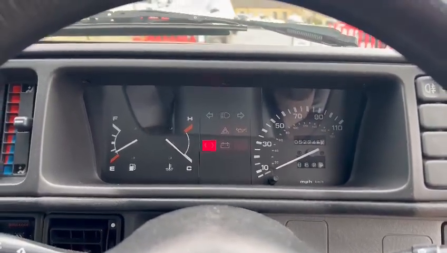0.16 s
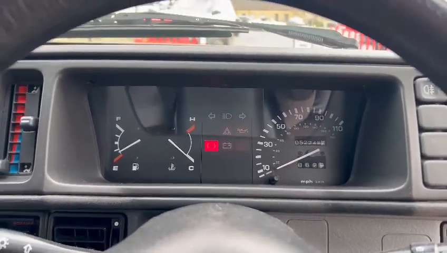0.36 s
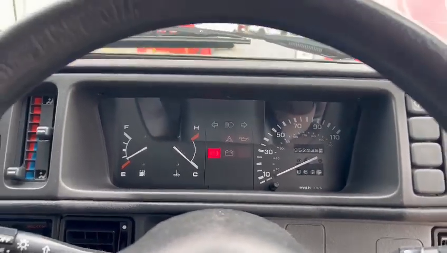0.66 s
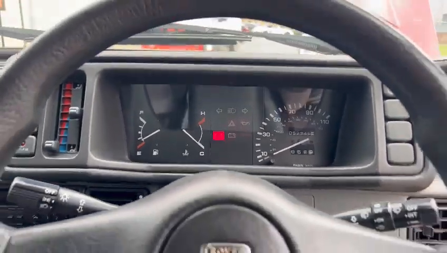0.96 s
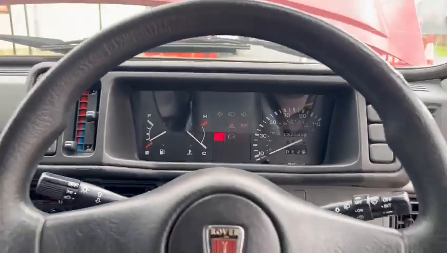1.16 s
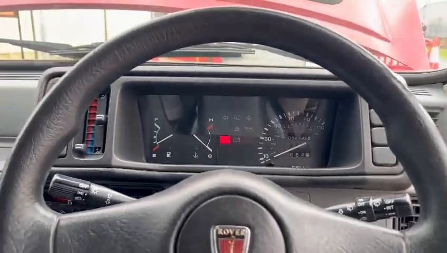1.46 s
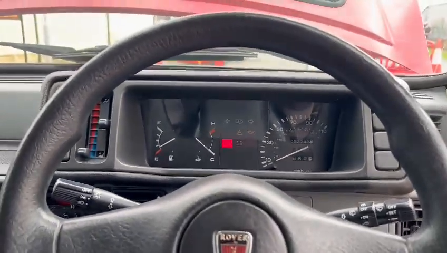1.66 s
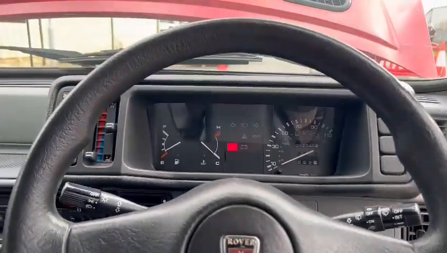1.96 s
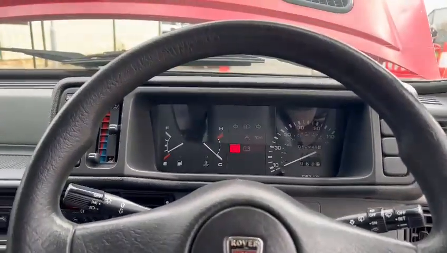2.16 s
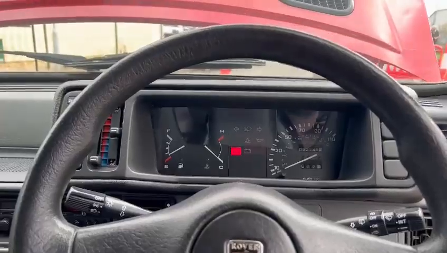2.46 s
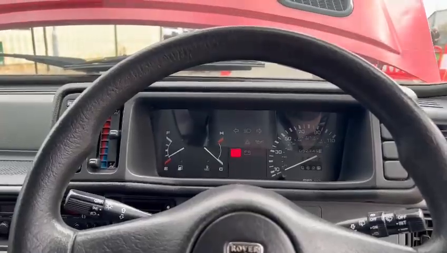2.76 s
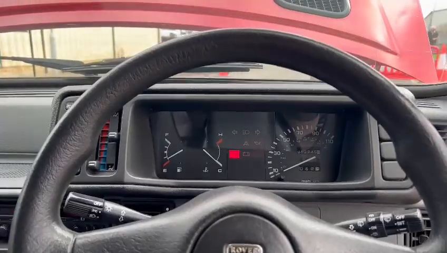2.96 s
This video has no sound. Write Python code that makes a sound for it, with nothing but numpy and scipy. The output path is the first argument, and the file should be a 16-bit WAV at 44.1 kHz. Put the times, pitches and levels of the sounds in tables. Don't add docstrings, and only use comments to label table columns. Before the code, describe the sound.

A small four-cylinder car engine idles steadily with quick ticks, then is blipped twice, booming and roaring; heard from the driver's seat with the bonnet open, by a hand-held stereo microphone.

```python
import sys
import numpy as np
from scipy import signal
from scipy.fft import rfft, irfft, next_fast_len
from scipy.io import wavfile
from scipy.ndimage import uniform_filter1d, map_coordinates

SR = 44100
rng = np.random.default_rng(int(sys.argv[2]) if len(sys.argv) > 2 else 0)


def boost_factor(decibels):
    exponent = np.asarray(decibels, float) / 20
    return 10 ** exponent


def to_wav(sig):
    pcm = np.clip(np.atleast_2d(sig), -1, 1) * 32767
    pcm = np.round(pcm).astype(np.int16)
    wavfile.write(sys.argv[1], SR, pcm.T)


N = 136710


def unit(x):
    return x / np.sqrt(np.mean(x ** 2) + 1e-20)


def along(points, hz):
    f, v = np.transpose(points)
    return np.interp(np.log(hz + 1), np.log(f + 1), v)


def curve(rows):
    s, value = np.transpose(rows)
    return np.interp(np.arange(N) / SR, s, value)


def wobble(rate):
    return map_coordinates(rng.standard_normal(400), [np.arange(N) * rate / SR])


def filtered(x, response):
    m = next_fast_len(N + SR // 2)
    return irfft(rfft(x, m) * response(np.fft.rfftfreq(m, 1 / SR)), m)[..., :N]


def ringing(peaks):
    def response(f):
        total = 0
        for k, (centre, width, db) in enumerate(peaks):
            damping = 1j * f * width
            total = total + (-1) ** k * boost_factor(db) * damping / (centre * centre - f * f + damping)
        return total
    return response


def double_ringing(peaks):
    return lambda f: ringing(peaks)(f) ** 2


def shaped(points):
    return lambda f: boost_factor(along(points, f))


def pulse(phase, depth):
    return 1 + depth * np.cos(phase - 1.1)


# frequency in Hz, left-right correlation from 0 to 1.
EAR_LIKENESS = [(30, .99), (100, .96), (200, .75), (500, .45), (1500, .65), (3000, .62), (5000, .2),
                (8000, .25)]


def rush(response, gate=1):
    def mid_side_gains(hz):
        turn = np.arccos(np.clip(along(EAR_LIKENESS, hz), -1, 1)) / 2
        return response(hz) * [np.cos(turn), np.sin(turn)]
    mid, side = filtered(rng.standard_normal((2, N)) * gate, mid_side_gains)
    return unit(np.array([mid + side, mid - side]))


def tone(phase, db):
    return np.sqrt(2) * boost_factor(db) * np.sin(phase)


# frequency in Hz, density in dB per Hz.
RUMBLE_SPECTRUM = [(12, -35), (24, -12.5), (34, -7.8), (62, -2.6), (110, -11.5), (190, -27.5), (320, -37)]


def body_rumble(over_db):
    level_db = -40 + 0.65 * (over_db + 20) + 1.4 * wobble(9.1)
    return boost_factor(level_db) * rush(lambda f: shaped(RUMBLE_SPECTRUM)(f) * (f < 420))


# frequency in Hz, density in dB per Hz.
IDLE_SPECTRUM = [(110, -26), (180, 1.5), (432, -20), (602, -6.5), (1000, -28), (1360, -10), (1550, -45.5),
                 (1850, -24.5), (3050, -31.5), (3960, -48), (6710, -120)]


def idle_rush(phase):
    return boost_factor(-46.5) * rush(shaped(IDLE_SPECTRUM), pulse(phase, 0.2))


TOP_HZ = 9750

# frequency in Hz, density in dB per Hz.
HISS_SPECTRUM = [(2200, -12), (2600, 2), (3500, -5), (4300, -1), (6300, -1), (7350, -8), (8600, -4),
                 (9650, -12)]


def throttle_hiss(over_db, phase):
    noise = rush(lambda f: shaped(HISS_SPECTRUM)(f) * (f < TOP_HZ), pulse(phase, .15))
    return boost_factor(-44 + 0.76 * over_db) * noise


# frequency in Hz, width in Hz, level in dB.
INJECTOR_MODES = [(6250, 500, 0), (5000, 500, -8), (8700, 800, -8)]


def injector_fizz(over_db, phase):
    noise = rush(lambda f: double_ringing(INJECTOR_MODES)(f) * (f < TOP_HZ), pulse(phase, 0.092))
    return boost_factor(-60.5 + 0.41 * over_db) * noise


def thin_air(over_db):
    centre_hz, width_hz = 11400, 430
    level_db = -62 + 1.3 * over_db + 4.4 * wobble(45)
    return boost_factor(level_db) * rush(lambda f: np.exp(-((f - centre_hz) / width_hz) ** 4))


# frequency in Hz, width in Hz, level in dB.
NEAR_PANEL = [(650, 92, -2), (1312, 140, -3.8), (1424, 33, -0.75)]
FAR_PANEL = [(1841, 39, .1)]


def valve_ticks(hz, phase):
    move_s, move_len_s, jitter_s, scatter_db = 0.92, 0.084, .00004, 1
    firings = np.flatnonzero(np.diff(np.floor(phase / (2 * np.pi))))
    late, strength = rng.standard_normal((2, len(firings)))
    at = firings + np.round(late * jitter_s * SR).astype(int)
    blows = np.bincount(np.clip(at, 0, N - 1), boost_factor(scatter_db * strength), N)
    near = unit(filtered(blows, double_ringing(NEAR_PANEL)))
    far = unit(filtered(blows, double_ringing(FAR_PANEL)))
    moved = np.clip((np.arange(N) / SR - move_s) / move_len_s + .5, 0, 1)
    idle_only = boost_factor(-40 * np.log2(hz / hz[0]))
    return idle_only * (boost_factor(-49.5) * (1 - 0.27 * moved) * near + boost_factor(-51.5) * moved * far)


# frequency in Hz, gain in dB.
WHINE_PATH_DB = [(300, -25), (450, -12), (560, -12), (620, -2), (690, -14), (740, 3), (830, 1), (890, -1)]


def alternator_whine(hz, phase):
    ratio = 7.17
    level_db = -38 + 9 * np.log2(hz / 120) + along(WHINE_PATH_DB, ratio * hz)
    return tone(ratio * phase + .4 * wobble(30), level_db + 1.8 * wobble(14))


# multiple of the firing rate, level in dB at idle, unsteadiness in dB.
IMBALANCE = [(0.499, -46, 0.5), (0.752, -40, 2), (1.498, -40.5, 3.5), (1.748, -47, 4), (3, -60.5, 1.5)]
# frequency in Hz, gain in dB.
IMBALANCE_PATH = [(20, -4.5), (35, -3.8), (62, 2.3), (100, -4.5), (150, 0.8), (185, -13.5), (300, 0)]


def uneven_cylinders(hz, phase):
    speed_db = 3 * np.log2(hz / hz[0])
    out = np.zeros(N)
    for k, db, shaky_db in IMBALANCE:
        level_db = db + speed_db + along(IMBALANCE_PATH, k * hz) + shaky_db * wobble(10)
        out += tone(k * phase + .8 * wobble(9), level_db)
    return out


# frequency in Hz, width in Hz, level in dB.
GULP_MODES = [(1320, 260, -2.9), (472, 43, -1.2)]


def intake_gulp(phase):
    centre_s, length_s = 2.54, 0.029
    swell = np.exp(-((np.arange(N) / SR - centre_s) / length_s) ** 2)
    return boost_factor(-25.5) * swell * rush(double_ringing(GULP_MODES), pulse(phase, 0.18))


# frequency in Hz, width in Hz, level in dB.
TRUNK_MODES = [(217, 89, 0.59), (440, 320, -2.9)]


def intake_growl(over_db, open_db, phase):
    return boost_factor(-36 + open_db + .35 * over_db) * rush(double_ringing(TRUNK_MODES), pulse(phase, 0.43))


# frequency in Hz, density in dB per Hz.
ROAR_SPECTRUM = [(110, -45), (180, -4.5), (475, -4.5), (686, -12), (772, -10), (1400, -12), (2020, -13.5),
                 (2740, -26.5), (3050, -19.5), (3960, -66), (6710, -120)]


def engine_roar(effort_db, phase):
    fade = np.clip((effort_db + 53.5) / 8, 0, 1)
    return boost_factor(effort_db + 0.39 * wobble(25)) * fade * rush(shaped(ROAR_SPECTRUM), pulse(phase, 0.12))


# multiple of the firing rate, level in dB, unsteadiness in dB.
HARMONICS = [(2, -0.27, 1.06), (3, -1, -0.1), (4, -7.5, -3.1), (5, -21, 9), (6, -7.5, 8), (8, -21, 3),
             (9, -13, 9.5)]
# frequency in Hz, gain in dB.
CABIN_GAIN = [(86, -9.5), (115, -14), (140, -19), (168, -30), (205, -27.5), (270, -40), (440, -32.5),
              (620, -48.5)]


def firing_overtones(hz, open_db, phase):
    out = np.zeros(N)
    for k, db, shaky_db in HARMONICS:
        level_db = db + open_db + along(CABIN_GAIN, k * hz) + shaky_db * wobble(13)
        out += tone(k * (phase - .6), level_db)
    return out


# time in seconds, gas push minus piston shake at the firing rate (signed, about -1 to 1).
NET_PUSH = [(0, -0.31), (1.44, .2), (1.56, .9), (1.64, 1.1), (1.69, 0.71), (1.74, 1.5), (1.77, -0.12),
            (1.805, -0.86), (1.835, -0.36), (1.87, -0.81), (2.075, -0.83), (2.115, -0.19), (2.16, -1.1),
            (2.235, .02), (2.3, 1.05), (2.545, 1.3), (2.61, -1.23), (3.1, -0.59)]
# frequency in Hz, level in dB.
SEAT_GAIN = [(40, -46.5), (58, -16), (72, -13), (84, -15.5), (95, -12), (110, -14), (125, -15)]


def cabin_boom(hz, phase):
    push = curve(NET_PUSH)
    bent = np.sign(push) * abs(push) ** 1.39
    return bent * tone(phase, along(SEAT_GAIN, hz) + .6 * wobble(4.8))


# frequency in Hz, left minus right in dB.
EAR_TILT = [(40, -6.7), (80, 3.5), (150, 2.4), (400, 0), (800, -4), (1300, -4.5), (2600, -.6), (5000, 1.1)]


def at_the_ears(x):
    ear = np.array([[.5], [-.5]])
    null_hz, null_width_hz, null_db = 695, 35, -10
    lag_s, lag_under_hz = .000165, 3253

    def response(f):
        null = null_db * np.exp(-((f - null_hz) / null_width_hz) ** 2)
        delay = np.exp(-2j * np.pi * f * lag_s * ear * (f < lag_under_hz))
        return boost_factor(ear * along(EAR_TILT, f) + null) * delay
    return filtered(x, response)


# time in seconds, firing rate in Hz.
FIRING_RATE = [(0, 43.15), (1.3, 43.2), (1.41, 44), (1.54, 55.8), (1.69, 84), (1.72, 87.2), (1.77, 89),
               (1.94, 75.2), (2.11, 66), (2.22, 62.3), (2.3, 69), (2.39, 89), (2.46, 104), (2.53, 116.6),
               (2.58, 123), (2.66, 120.4), (2.87, 99.4), (3.1, 81.4)]
# time in seconds, level in dB.
EFFORT_DB = [(0.0, -41.5), (0.02, -48), (1.33, -47.5), (1.67, -33.5), (1.78, -34), (1.87, -39.5),
             (2.21, -43.5), (2.32, -33.5), (2.34, -35), (2.4, -31.5), (2.42, -34.5), (2.48, -28),
             (2.55, -26), (2.58, -28), (2.81, -30.5), (3.1, -38.5)]
# time in seconds, opening in dB.
THROTTLE_DB = [(0, -17.5), (1.42, -17.5), (1.54, -1), (1.64, 1.2), (1.69, -12), (2.06, -23), (2.12, -9.5),
               (2.17, -23.5), (2.24, -7.5), (2.31, -2.5), (2.37, -14), (2.45, 0.7), (2.54, -1), (2.6, -24),
               (3.1, -21)]


def scene():
    hz, effort_db, open_db = curve(FIRING_RATE), curve(EFFORT_DB), curve(THROTTLE_DB)
    phase = 2 * np.pi * np.cumsum(hz) / SR
    over_db = effort_db + 27
    mix = body_rumble(over_db) + idle_rush(phase)
    mix += throttle_hiss(over_db, phase) + injector_fizz(over_db, phase) + thin_air(over_db)
    mix += valve_ticks(hz, phase) + alternator_whine(hz, phase) + uneven_cylinders(hz, phase)
    mix += intake_gulp(phase) + intake_growl(over_db, open_db, phase) + engine_roar(effort_db, phase)
    mix += firing_overtones(hz, open_db, phase) + cabin_boom(hz, phase)
    return at_the_ears(mix)


# frequency in Hz, threshold in standard deviations.
LOSS_RARITY = [(900, 9), (1500, 2.3), (2000, 3), (2550, .9), (3000, 1.2), (3600, .1), (4400, 1.3),
               (5500, .8), (6300, 2.6), (7400, .6), (8500, 1.3), (9500, .4), (11400, -.1)]


def flickering_bands(x):
    hz, _, z = signal.stft(x, SR, nperseg=1024)
    luck = uniform_filter1d(rng.standard_normal((90, z.shape[2])), size=4, axis=1)
    luck = unit(luck)[np.arange(len(hz)) // 6]
    power = uniform_filter1d(np.sum(abs(z) ** 2, axis=(0, 1)), size=9)
    loud_db = 10 * np.log10(power + 1e-9)
    loud_shift = .045 * (loud_db - loud_db.mean()) * (hz[:, None] < TOP_HZ)
    keep = np.where(luck + loud_shift > along(LOSS_RARITY, hz)[:, None], boost_factor(-26), 1)
    return signal.istft(z * keep, SR, nperseg=1024)[1][:, :N]


def band_limit(x):
    return signal.sosfilt(signal.butter(12, 12040, fs=SR, output="sos"), x)


def record(dry):
    mix = flickering_bands(dry)
    return band_limit(mix)


dry = scene()
out = record(dry)
to_wav(out)
```